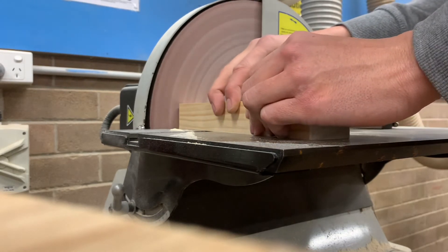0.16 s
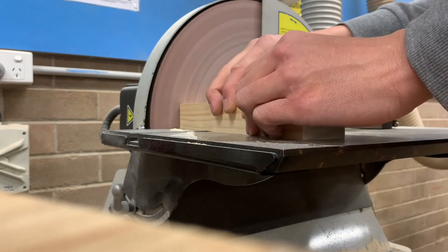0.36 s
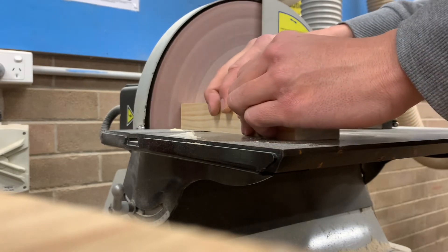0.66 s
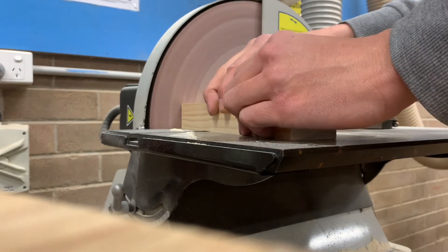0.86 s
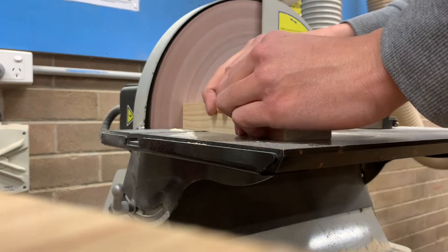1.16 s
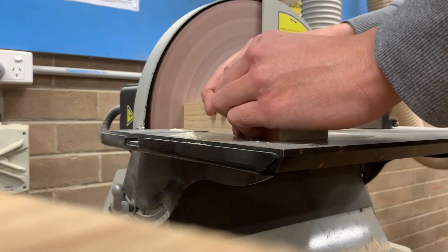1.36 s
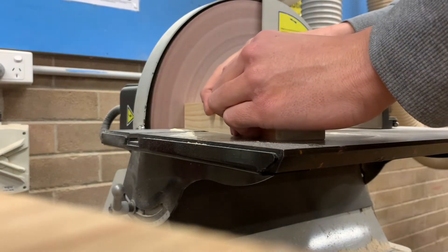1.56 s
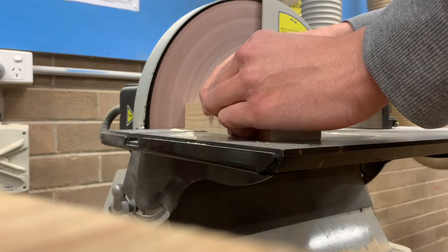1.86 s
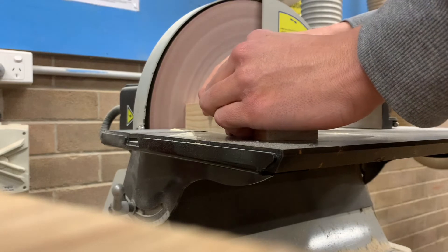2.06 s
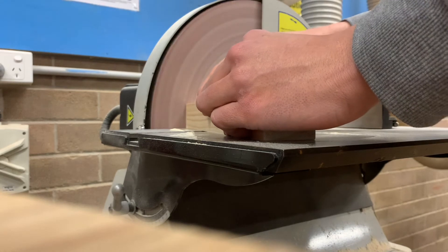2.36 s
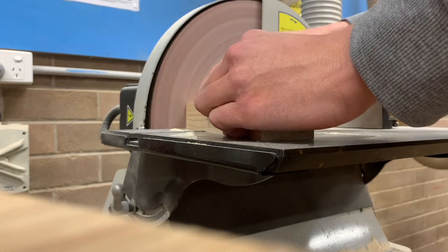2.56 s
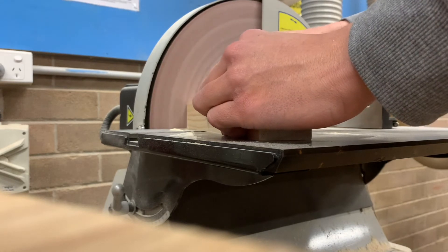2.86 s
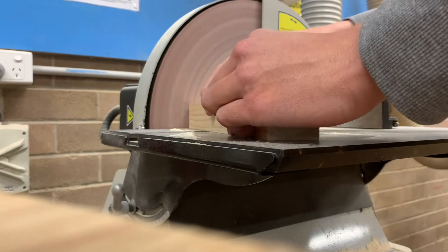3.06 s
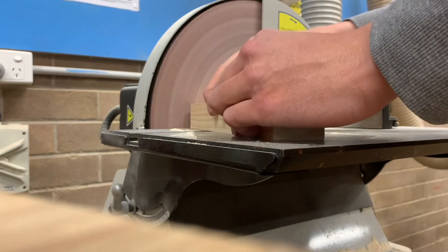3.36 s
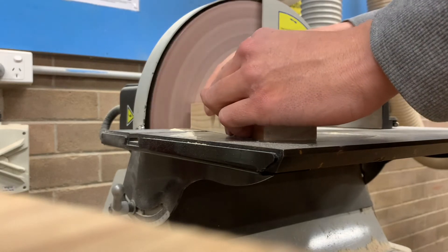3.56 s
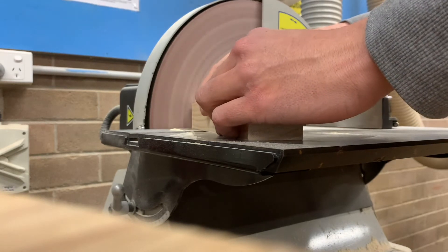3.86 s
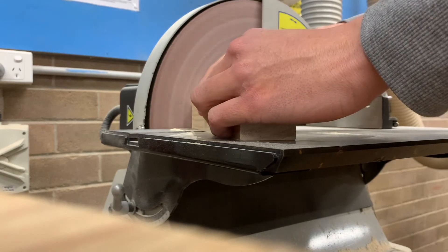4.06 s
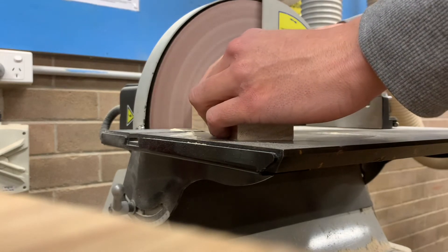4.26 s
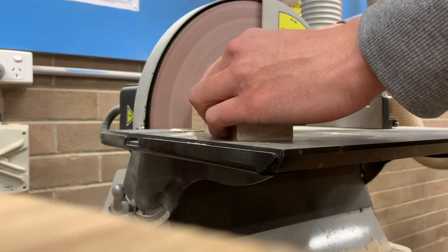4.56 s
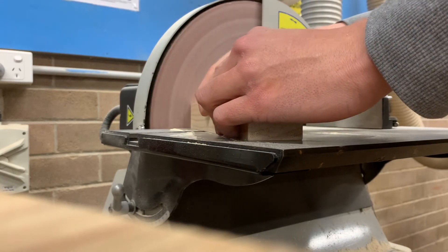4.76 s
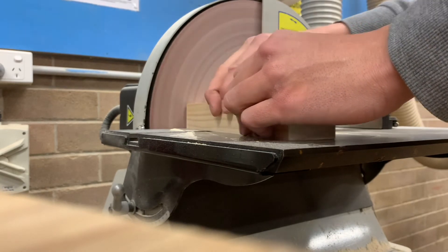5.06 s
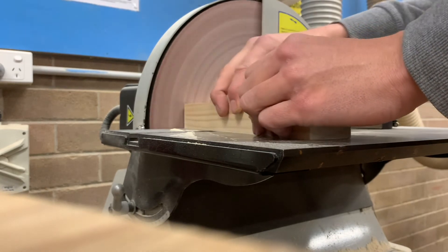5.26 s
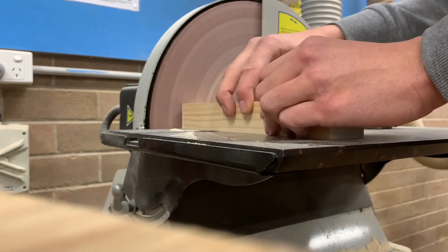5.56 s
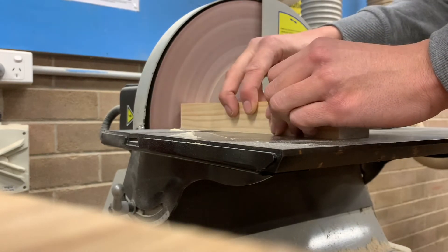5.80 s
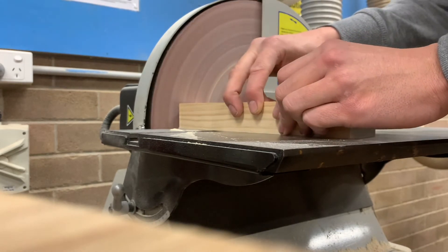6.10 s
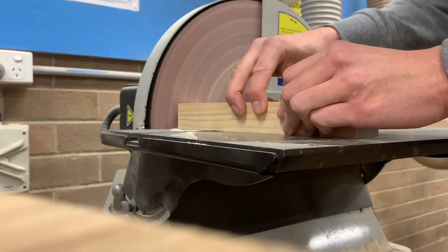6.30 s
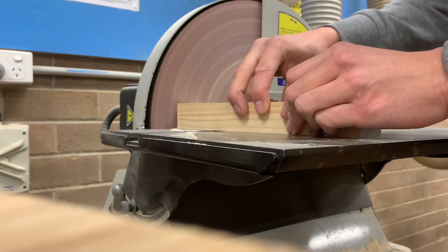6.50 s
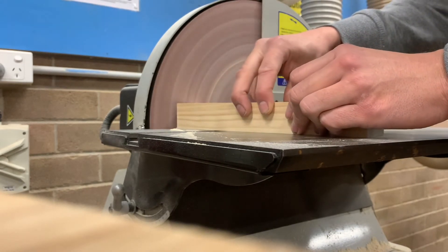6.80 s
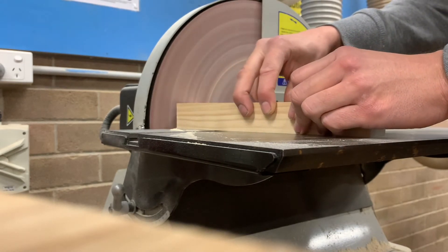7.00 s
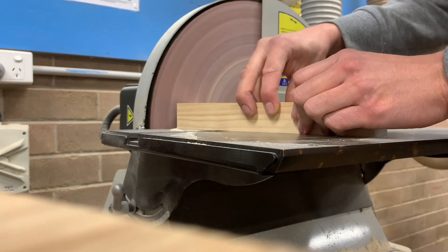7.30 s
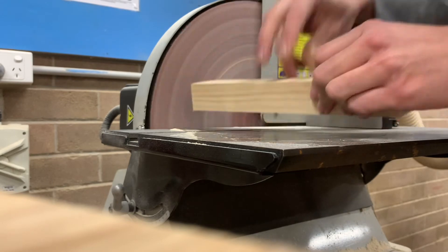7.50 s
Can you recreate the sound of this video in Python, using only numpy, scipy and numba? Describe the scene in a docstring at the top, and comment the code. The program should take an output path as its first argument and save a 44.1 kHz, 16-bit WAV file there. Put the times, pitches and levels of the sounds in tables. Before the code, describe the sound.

Phone-like stereo pickup near a running disc sander in a small, hard-walled workshop. Coarse sanding begins immediately, fluttering rapidly with each turn and ringing through wood and table. It pauses for a second over low hum and airy whir, returns softly, stutters in rapid touches, and settles into firm sanding again. Finally the block comes away and knocks lightly while the machine keeps running.

```python
"""Buzzing hiss of wood fed to a bench disc sander, eased off, touched on in chatter and fed again.
The same grit passes the wood each turn, so the hiss buzzes at shaft rate; runout makes a light touch chatter.
Block, disc and table ring under the scraping; hands, sleeves and brick walls return echoes.
Underneath, the induction motor hums and whirs and the disc stirs the air; wood ticks on the table at the end."""
import sys
import numpy as np
from scipy import signal
from scipy.fft import rfft, irfft, next_fast_len
from scipy.io import wavfile
from scipy.ndimage import uniform_filter1d, map_coordinates
from numba import njit

SR = 44100
rng = np.random.default_rng(int(sys.argv[2]) if len(sys.argv) > 2 else 0)


def inscribe(sig):
    """Save sig as 16-bit PCM at rate SR to the path in sys.argv[1].

    A 1-D sig is mono; a 2-D sig holds one channel per row.
    Samples are clipped to [-1, 1] before scaling.
    """
    pcm = np.round(np.clip(np.atleast_2d(sig).T, -1, 1) * 32767)
    wavfile.write(sys.argv[1], SR, pcm.astype(np.int16))


N = 336924
T = np.arange(N) / SR


def undb(db):
    """Decibels to gain."""
    return 10 ** (np.asarray(db) / 20)


def unit(x):
    """Scale to rms 1."""
    return x / np.sqrt(np.mean(x ** 2))


def curves(rows):
    """Table columns against time, joined by straight lines."""
    t_s, *columns = np.transpose(rows)
    return [np.interp(T, t_s, column) for column in columns]


def walk(rate_hz):
    """Smoothed random steps, rms 1."""
    k = int(SR / rate_hz)
    steps = np.repeat(rng.standard_normal(N // k + 1), k)
    return unit(uniform_filter1d(uniform_filter1d(steps, k), k)[:N])


def colour(x, points, lag_s=0):
    """Shape x by (f/Hz, level/dB) points, roll off below the first, delay, scale to rms 1."""
    size = next_fast_len(N + 2048)
    f = np.maximum(np.arange(size // 2 + 1) * SR / size, 1)
    hz, db = np.transpose(points)
    gain = undb(np.interp(np.log(f), np.log(hz), db)) * np.minimum(f / hz[0], 1) ** 2
    delay = np.exp(-2j * np.pi * f * lag_s)
    return unit(irfft(rfft(x, size) * gain * delay, size)[:N])


@njit
def svf(x, hz, width_hz):
    """State-variable band-pass with a movable centre."""
    y, band, low = np.empty(len(x)), 0., 0.
    for i in range(len(x)):
        g, k = np.tan(np.pi * hz[i] / SR), width_hz / hz[i]
        v = (band + g * (x[i] - low)) / (1 + g * (g + k))
        band, low, y[i] = 2 * v - band, low + 2 * g * v, k * v
    return y


def ring(x, hz, width_hz):
    """One resonance, fixed or moving."""
    return svf(x, hz + np.zeros(N), float(width_hz))


def delayed(x, lag_s):
    """x heard later; the lag may move."""
    return map_coordinates(x, [np.arange(N) - lag_s * SR], order=3)


def echoes(x, t60, start_s):
    """Dense exponentially decaying reflections, unrelated at the two ports."""
    t = np.arange(SR // 2) / SR
    decay = np.exp(-np.log(1000) * t / t60) * (t > start_s)
    response = rng.standard_normal((2, len(t))) * decay
    response /= np.sqrt(np.sum(response ** 2, axis=1, keepdims=True))
    return signal.fftconvolve(x[None], response, axes=1)[:, :N]


def surface(turns, keep, fresh, size=1774):
    """Random profile round the disc, met each turn: it changes slowly and is partly new each time."""
    keep, fresh = np.clip([keep, fresh], .01, .99)
    worn, new = rng.standard_normal((2, 200, size))
    for k in range(1, len(worn)):
        worn[k] = keep * worn[k - 1] + np.sqrt(1 - keep ** 2) * worn[k]
    profile = np.sqrt(1 - fresh) * worn + np.sqrt(fresh) * new
    return map_coordinates(profile.ravel(), [turns * size], order=3)


# phase lead of the left port over the right, by frequency: f/Hz, lead/rad
PORT_PHASE_POINTS = [(0, 0), (1600, 1), (2150, 1.5), (2500, 3.2), (2800, 4.2), (3250, 4), (3550, 5.6),
                     (4200, 4), (5300, 7.6), (6500, 6.3), (7000, 6.6), (9000, 9.25), (10200, 9.55),
                     (11900, 12.4), (14300, 12.7), (15700, 15.6)]


def ports(x):
    """One source at the left and right ports, differing in phase by frequency."""
    size = next_fast_len(N + 2048)
    phase = np.interp(np.arange(size // 2 + 1) * SR / size, *np.transpose(PORT_PHASE_POINTS))
    return np.array([x, irfft(rfft(x, size) * np.exp(-1j * phase), size)[:N]])


def walls(x):
    """Brick walls return diffuse echoes, dulled above 8 kHz."""
    dulled = signal.sosfilt(signal.butter(2, 8000, fs=SR, output="sos"), x)
    return undb(-14.3) * echoes(dulled, t60=0.46, start_s=0.0045)


HUM_HZ = 100.03
MOTOR_LAG_S = np.array([[.00024], [0]])  # motor nearer the right port
# running machine: t/s, hum level/dB
MACHINE_LEVEL = [(0, -34.5), (1.4, -35.5), (3.25, -34), (3.5, -32), (7.64, -31.5)]


def swell():
    """Machine level about its mean, in dB, followed by whir and air."""
    hum_db, = curves(MACHINE_LEVEL)
    return 0.86 * (hum_db - hum_db.mean())


def hum():
    """Mains pull on the motor core, a sine at twice mains frequency."""
    hum_db, = curves(MACHINE_LEVEL)
    return np.sqrt(2) * undb(hum_db) * np.sin(2 * np.pi * HUM_HZ * (T - MOTOR_LAG_S))


# mains, shaft and bearing lines before swell: f/Hz, level/dB, waver/dB rms, growth over the run/dB
MOTOR_LINES = [(63.6, -45.5, 1.5, -1.5), (121.7, -55, 2.5, 0.5), (150.6, -57.5, 4, 0.5), (199.7, -68, 0, 0),
               (298.8, -61, .5, -1.5), (447.3, -56.3, 0.5, -1.5), (502.7, -60.5, 3, 0.5),
               (699, -54, 1.55, 2), (744, -67, 1, 0), (922, -73, 2, 8.5), (1052, -70.5, 1.5, 6.5),
               (1300, -73, 2.5, 12.5)]


def motor_lines():
    """Sines wavering in level and phase; they follow part of the machine's swell."""
    lines = 0
    for hz, db, waver_db, growth_db in MOTOR_LINES:
        phase = 2 * np.pi * (hz * (T - MOTOR_LAG_S) + rng.random()) + 0.32 * walk(4.9)
        level_db = db + waver_db * walk(11) + growth_db * T / T[-1]
        lines = lines + np.sqrt(2) * undb(level_db) * np.sin(phase)
    return lines * undb(0.68 * swell())


# bearing and casing noise: f/Hz, relative level/dB
WHIR_SPECTRUM = [(160, 3), (290, 3), (380, -3.5), (480, 1.5), (580, -5.5), (730, -0.5), (900, -11),
                 (1300, -7), (1750, -20.5), (2300, -16), (4000, -71)]


def whir(turns):
    """Bearing noise: bass straight from the casing, upper part from all sides."""
    casing = surface(turns, keep=0.96, fresh=0.6)
    direct = np.array([colour(casing, WHIR_SPECTRUM, lag_s=lag) for lag in MOTOR_LAG_S[:, 0]])
    direct = signal.sosfilt(signal.butter(1, 1200, fs=SR, output="sos"), direct)
    around = np.array([colour(rng.standard_normal(N), WHIR_SPECTRUM) for _ in range(2)])
    around = signal.sosfilt(signal.butter(1, 900, "high", fs=SR, output="sos"), around)
    return undb(-46 + swell() + 1.4 * walk(14)) * (undb(-2) * direct + around)


# stand noise: f/Hz, relative level/dB
RUMBLE_SPECTRUM = [(20, -21), (32, -7), (45, 5.5), (60, 5), (78, 16), (100, 14), (150, -65)]


def rumble():
    """Stand vibration as low noise of wandering level."""
    return undb(-51 + 2 * walk(3)) * colour(rng.standard_normal(N), RUMBLE_SPECTRUM)


def motor(turns):
    """Hum, lines, whir and rumble, all a little stronger at the right port."""
    low_balance, high_balance = undb([[-.2], [.2]]), undb([[-1.5], [1.5]])
    return (hum() + rumble()) * low_balance + (motor_lines() + whir(turns)) * high_balance


# air dragged past the guard: f/Hz, relative level/dB
SWISH_SPECTRUM = [(1450, -8.5), (1700, 5), (1900, 1.5), (2350, -6.5), (2650, 5), (2930, 3), (3100, -8),
                  (3450, -5.5), (3680, -6.5), (4000, -14.5), (5600, -19.5), (6250, -15.5), (6900, -19),
                  (9000, -18), (15500, -24)]


def swish(turns):
    """Air noise dragged by the rough disc, fluttering once a turn."""
    flutter = unit(uniform_filter1d(surface(turns, keep=0.24, fresh=0.16), size=200))
    level_db = -53.5 + swell() + 2.0 * np.cos(2 * np.pi * (turns + 0.37)) + 2.0 * flutter
    return undb(level_db) * colour(rng.standard_normal(N), SWISH_SPECTRUM)


# block ticking on the table as it is lifted: t/s, peak force level/dB
TICK_FORCES = [(7.537, -38.5), (7.578, -42), (7.588, -40), (7.617, -38)]


def ticks():
    """Dry knocks of wood on steel: decaying noise bursts."""
    force = sum(undb(db) * (T >= s) * np.exp(-np.abs(T - s) / 0.003) for s, db in TICK_FORCES)
    spectrum = [(3000, 2), (7000, 13.5), (11000, 8), (15000, -12)]  # f/Hz, relative level/dB
    return undb(-9.0) * force * colour(rng.standard_normal(N), spectrum)


RELEASE_S = 0.0464
# block passes: start t/s, end t/s, attack/s, first ring f/Hz, settled ring f/Hz,
# fizz level at start/dB, fizz level at end/dB
BLOCK_PASSES = [ (0.0, 2.912, 0.0034, 9060, 10800, 3, -3.5), (4.075, 4.582, 0.021, 9300, 9500, -7, 9),
                (4.765, 7.34, .1, 9700, 8700, 5, 5), ]
# press of the block: t/s, level/dB
PRESSURE_CURVE = [(0, -32), (.2, -30), (.66, -29.4), (1.5, -31), (2.6, -31), (2.9, -33.5), (4.1, -35.5),
                  (4.25, -37), (4.45, -35.5), (4.58, -36), (4.77, -54.5), (4.9, -36.5), (5.03, -34.5),
                  (5.12, -31.5), (5.5, -32.5), (5.97, -29), (6.25, -31), (6.7, -31), (7.3, -34)]


def feed():
    """Each pass presses in, follows the hand pressure and lets go."""
    touch = 0
    for start, end, attack, *_ in BLOCK_PASSES:
        touch = touch + np.clip(np.minimum((T - start) / attack, (end - T) / RELEASE_S), 0, 1)
    return touch * undb(curves(PRESSURE_CURVE)[0])


FIRM_DB = -33


def load(press):
    """How firmly the block is held to the disc, 0-1."""
    return np.minimum(press / undb(FIRM_DB), 1)


FREE_TURNS_PER_S, SAG_TURNS_PER_S = 24.96, .11


def shaft(press):
    """Turns made so far; the motor sags a little under load."""
    return np.cumsum(FREE_TURNS_PER_S - SAG_TURNS_PER_S * load(press)) / SR


BLOCK_DB, BLOCK_FADE_DB_PER_S, GRIP_SETTLE_S = 4, 5, 0.28


def grip():
    """The grip damps the block: ring f/Hz settles, ring level/dB fades, fizz level/dB slides."""
    rows = np.array(BLOCK_PASSES)
    current = np.maximum(np.searchsorted(rows[:, 0], T) - 1, 0)
    start, end, *_, first_hz, settled_hz, first_db, last_db = rows[current].T
    age = np.clip(T - start, 0, end - start)
    hz = settled_hz + (first_hz - settled_hz) * np.exp(-age / GRIP_SETTLE_S)
    fizz_db = first_db + (last_db - first_db) * age / (end - start)
    return hz, BLOCK_DB - BLOCK_FADE_DB_PER_S * age, fizz_db


BOUNCE_S, SLAP_ATTACK_S, SLAP_DECAY_S = 0.009, 0.0028, 0.0042
SOFT_RISE_SHARE, SOFT_RISE_S = 0.086, 0.0097  # soft rise before each slap
# slaps of the high spot just off the disc: t/s, strike level/dB, rebound level/dB, contact/s
CHATTER_SLAPS = [ (2.891, -38, -39, 0.0087), (4.059, -47, -37, 0.0025), (4.0885, -34, -31, 0.008),
                 (4.126, -42, -29.5, 0.0037), (4.577, -40.5, -40, 0.0031), (4.698, -43, -41, 0.0019),
                 (4.738, -33.5, -44, 0.0033), (4.777, -32, -40, 0.0022), (4.8158, -25, -42, 0.0023),
                 (4.855, -24, -34, 0.0035), (4.887, -30, -25, 0.004), (4.926, -31, -29.5, 0.004),
                 (4.972, -28.5, -30, 0.0058), (5.013, -30, -34, 0.0057), (5.051, -28.5, -30, 0.005),
                 (7.313, -31.5, -36, 0.012), ]


def chatter():
    """The high spot slaps the wood and the block rebounds; each slap has a soft rise before it."""
    press = np.zeros(N)
    for s, strike_db, rebound_db, hold_s in CHATTER_SLAPS:
        for start, db in (s, strike_db), (s + BOUNCE_S, rebound_db):
            near = slice(*np.searchsorted(T, [start - .03, start + .1]))
            age = T[near] - start
            soft_rise = SOFT_RISE_SHARE * np.exp(np.minimum(age, 0) / SOFT_RISE_S)
            rise = np.minimum(soft_rise + np.maximum(age, 0) / SLAP_ATTACK_S, 1)
            touch = rise * np.exp(-np.maximum(age - hold_s, 0) / SLAP_DECAY_S)
            press[near] = np.maximum(press[near], undb(db) * touch)
    return press


RIDGE_WIDTH_TURNS = .04
# ridges of the disc: place/turn, height/runout
DISC_RIDGES = [(.03, 1.1), (.18, 0.53), (.32, 0.4), (.74, 0.88)]


def ridges(turns):
    """Extra push of each ridge as it comes round, zero mean."""
    push = 0
    for place, height in DISC_RIDGES:
        away = (turns - place + .5) % 1 - .5
        push = push + height * np.exp(-.5 * (away / RIDGE_WIDTH_TURNS) ** 2)
    return push - push.mean()


RUNOUT_DB, HIGH_SPOT_TURN = -48, 0.018 + 1 / 12
SHAKE_DB, SHAKE_RADIANS = -66, 0.78


def runout(turns, patches):
    """Push from the high spot, ridges, grit patches and hum shaking the disc."""
    wobble = 0.78 * np.cos(2 * np.pi * (turns - HIGH_SPOT_TURN)) + ridges(turns)
    shake = undb(SHAKE_DB) * np.cos(2 * np.pi * HUM_HZ * T - SHAKE_RADIANS)
    return undb(RUNOUT_DB) * (wobble + 0.51 * patches) + shake


# block modes: f/main ring f, width/Hz, relative level/dB
BLOCK_RING_MODES = [(0.97, 160, 2), (0.717, 530, -18.5)]


def block_ring(grit, block_hz):
    """Block modes gliding together under the scraping, rms 1."""
    modes = [undb(db) * ring(grit, ratio * block_hz, width) for ratio, width, db in BLOCK_RING_MODES]
    return unit(sum(modes))


# narrow wood rings shifted by the fingers: t/s, lower f/Hz, level/dB, upper f/Hz, level/dB
FINGER_RING_CURVES = [(0, 6000, -19, 6640, -16), (.5, 6000, -20, 6770, -7), (1.15, 5470, -17, 6760, -9),
                      (1.5, 5720, -21, 7100, -9), (2.9, 5580, -17, 7020, -7.5), (4.1, 5900, -20, 7040, -22),
                      (4.6, 5850, -9, 7070, -14), (4.85, 6000, -16, 6850, -21),
                      (5.2, 5700, -17, 6900, -11.5), (5.75, 5570, -30, 7200, -31),
                      (5.95, 5850, -17, 7150, -5), (6.4, 6150, -26, 6900, -9.5),
                      (6.75, 6200, -20, 6770, -5.5), (7.3, 6200, -11, 6700, -14)]


def finger_rings(grit):
    """The wood sings narrowly at two pitches that follow the fingers."""
    low_hz, low_db, high_hz, high_db = curves(FINGER_RING_CURVES)
    pairs = [(low_hz, low_db), (high_hz, high_db)]
    return sum(undb(db) * unit(ring(grit, hz, width_hz=215)) for hz, db in pairs)


FIZZ_DB_PER_DB, RING_DB_PER_DB = 3.5, 3  # fall per dB of pressure below FIRM_DB
# grit tearing wood fibres: f/Hz, relative level/dB
HISS_SPECTRUM = [(1000, -21), (2000, -14.5), (3000, 1), (4200, -40), (5500, -42), (6500, 0.5), (7800, 9.5),
                 (9200, 0), (10700, 4.5), (11700, -4.5), (15500, 2)]
# fizz of the finest fibres: f/Hz, relative level/dB
FIZZ_SPECTRUM = [(8000, -13), (11000, 3.5), (11700, 2), (12900, 6), (14200, 0.5), (15500, 5)]


def wood_hiss(fed, face, fine, edge):
    """Torn fibres hiss; the block's ring and the fizz fall away at a light touch."""
    block_hz, block_db, fizz_db = grip()
    block = load(fed) ** RING_DB_PER_DB * undb(block_db) * block_ring(edge, block_hz)
    fizz = load(fed) ** FIZZ_DB_PER_DB * undb(fizz_db) * colour(fine, FIZZ_SPECTRUM)
    return undb(1.34) * colour(face, HISS_SPECTRUM) + block + fizz + finger_rings(fine)


# disc and table modes: f/Hz, width/Hz, in-step level/dB, opposed level/dB
PLATE_MODES = [(1270, 110, -18.5, -38), (1720, 230, -21.5, -23), (2074, 123, -7.5, -14),
               (2230, 120, -47, -5.5), (2760, 150, -28, -0.5), (2984, 230, -1.5, 3.5),
               (3400, 145, -9.5, 1.5), (4290, 190, -4.5, -11), (4697, 420, -6, -3), (5325, 560, -5, -3.5),
               (6020, 360, -8.5, -35)]


def table_ring(in_step, opposed):
    """Broad disc and table modes, reaching the two ports in step or opposed."""
    size = next_fast_len(N + 2048)
    f = np.arange(size // 2 + 1) * SR / size
    gains = 0
    for hz, width, mid_db, side_db in PLATE_MODES:
        gains = gains + undb([[mid_db], [side_db]]) / (1 + (2 * (f - hz) / width) ** 2)
    mid, side = irfft(rfft(np.array([in_step, opposed]), size) * gains, size)[:, :N]
    return unit(np.array([mid + side, mid - side]))


# moving sleeve echo: t/s, lag/ms
SLEEVE_LAGS = [(0, 2.32), (.3, 2.25), (1.2, 1.46), (1.8, 1.43), (2.9, 1.4), (4.1, 1.09), (4.6, 1.09),
               (5, 1.43), (5.7, 1.31), (6, 1.56), (6.7, 1.55), (7, 2.04), (7.3, 2.32)]


def sleeves(x):
    """Sleeves throw back an inverted echo; its moving lag sweeps ripples through the rasp."""
    lag_ms, = curves(SLEEVE_LAGS)
    return np.array([port - .24 * delayed(port, lag_ms / 1000) for port in x])


HOLLOW_WIDTH_HZ, HOLLOW_DB = 550, -5.5  # level re plate
PLATE_FLUTTER = .8
# hiss scattered by table, guard and hands: f/Hz, relative level/dB
SCATTER_SPECTRUM = [(1000, -9), (1800, -23), (2400, -50), (3100, -35), (4050, -47), (5500, 21), (6500, 13),
                    (7800, -1), (9600, -46), (11200, 19), (12800, 25), (15000, -7)]
# hands at the disc: t/s, echo lag/ms, echo strength 0-1, hollow f/Hz
HAND_ECHO = [(0, 0.4, 0.27, 3660), (1.1, 0.43, 0.4, 3600), (1.8, 0.41, 0.37, 3520), (2.9, 0.43, 0.34, 3820),
             (4.05, 0.9, 0.04, 3730), (4.75, 0.63, 0.1, 3630), (5.1, 0.424, 0.23, 3600),
             (5.9, 0.42, 0.44, 3510), (7.3, 0.44, 0.17, 3640)]
# plate ring by how firmly the block sits: t/s, level/dB
SEATING_LEVEL = [(0, 4), (.4, 6.5), (1.1, 8), (2.9, 7.5), (4.1, 10.5), (4.6, 7.5), (5.15, 7.5), (5.75, 12),
                 (6.2, 4.5), (6.7, 7), (7.3, 4)]


def sanding(turns, fed):
    """Grit strikes the wood; pressure sets the hiss, and block, disc and table ring with it."""
    # uneven grain heights, in coarser and finer patches
    heights = surface(turns, keep=0.65, fresh=0.061)
    patches = unit(uniform_filter1d(surface(turns, keep=0.82, fresh=0.23), size=130))
    bite = unit(undb(4.4 * heights + 0.13 * patches))
    # runout tells most at a light touch
    bump = runout(turns, patches)
    contact = np.maximum(fed + bump, 0) / np.sqrt(fed ** 2 + np.mean(bump ** 2))
    slaps = chatter()
    press = np.maximum(fed, 0.9 * slaps)
    force = np.maximum(fed * contact, slaps)
    # each stretch of the contact face meets its own track of grit
    tracks = [bite * surface(turns, keep=.95, fresh=.16) for _ in range(6)]
    face, fine, edge, base, *flanks = tracks
    # hiss, with fixed echoes off the steel table
    direct = force * wood_hiss(fed, face, fine, edge)
    direct = direct + undb(-10) * echoes(direct, t60=.018, start_s=.0008)[0]
    scattered = undb(-9) * force * np.array([colour(grit, SCATTER_SPECTRUM) for grit in flanks])
    # the hands throw back an inverted echo that moves with them
    lag_ms, strength, hollow_hz = curves(HAND_ECHO)
    rasp = [x - strength * delayed(x, lag_ms / 1000) for x in ports(direct) + scattered]
    hollow = unit(ring(ring(edge, hollow_hz, HOLLOW_WIDTH_HZ), hollow_hz, HOLLOW_WIDTH_HZ))
    plate = table_ring(base, fine) + undb(HOLLOW_DB) * ports(hollow)
    # plate push levels off with pressure; a lightly held block deepens its flutter
    push = force / (1 + press / undb(-43.0)) ** 1.117
    flutter = PLATE_FLUTTER * (1 - load(fed) ** 2)
    push = push * np.maximum(contact, slaps > fed) ** flutter
    seating_db, = curves(SEATING_LEVEL)
    return sleeves(np.array(rasp) + undb(seating_db) * push * plate)


def scene():
    """Disc and motor, with the brick walls answering the disc side."""
    fed = feed()
    turns = shaft(fed)
    disc = sanding(turns, fed) + ports(ticks() + swish(turns))
    return disc + walls(disc[0]) + motor(turns)


def record(dry):
    """The phone cuts the top: steep elliptic low-pass at 15.75 kHz."""
    return signal.sosfilt(signal.ellip(10, .2, 80, 15750, fs=SR, output="sos"), dry)


dry = scene()
out = record(dry)
inscribe(out)
```